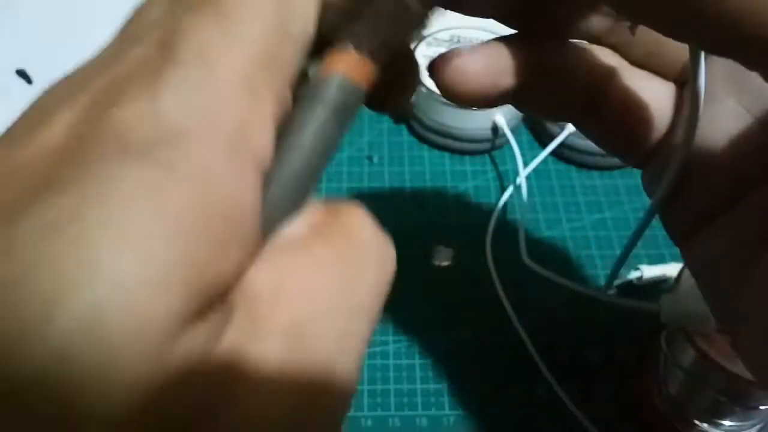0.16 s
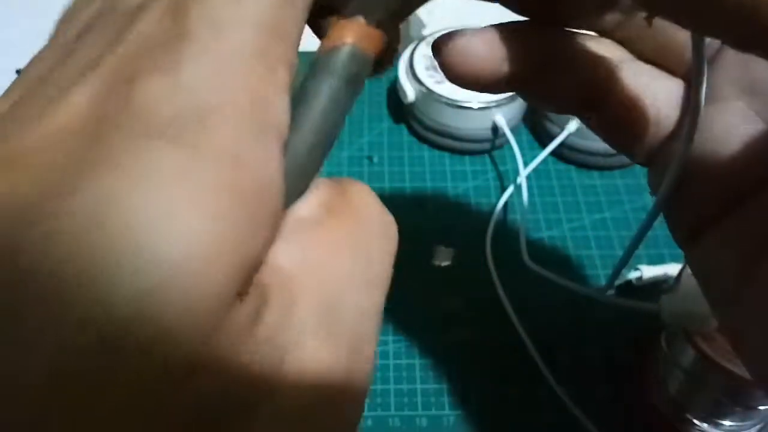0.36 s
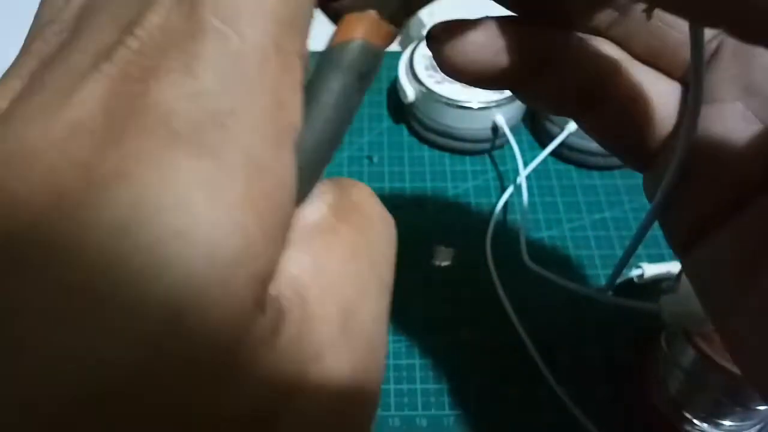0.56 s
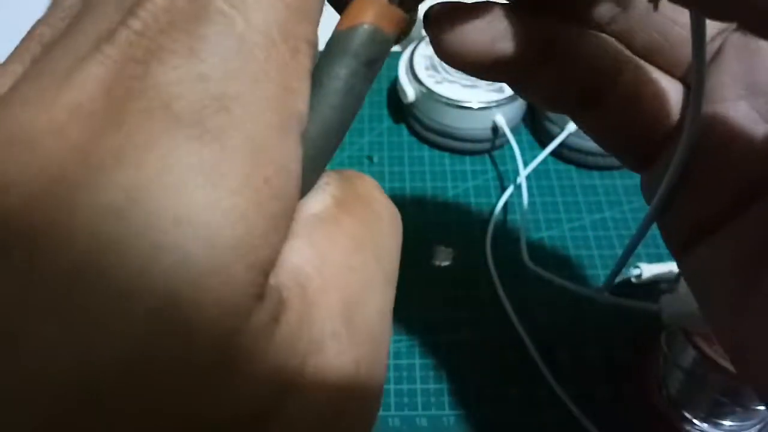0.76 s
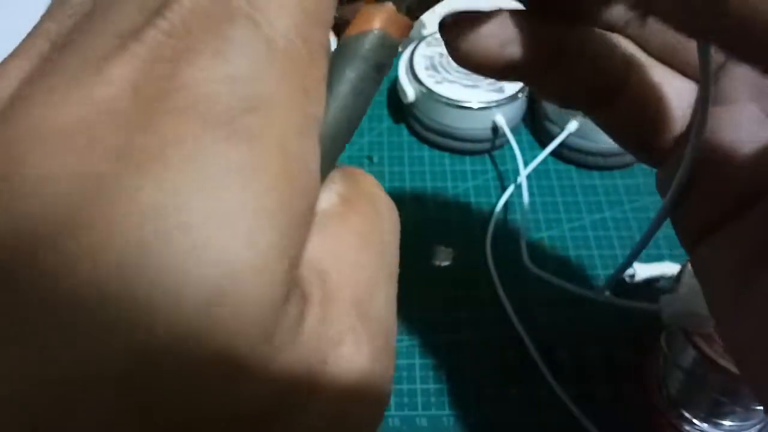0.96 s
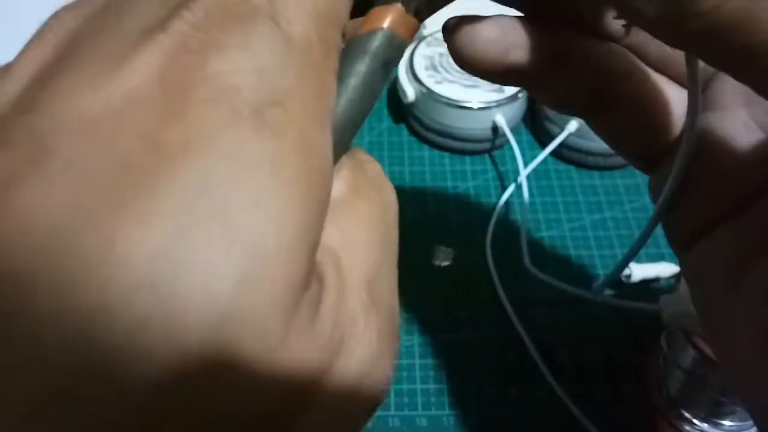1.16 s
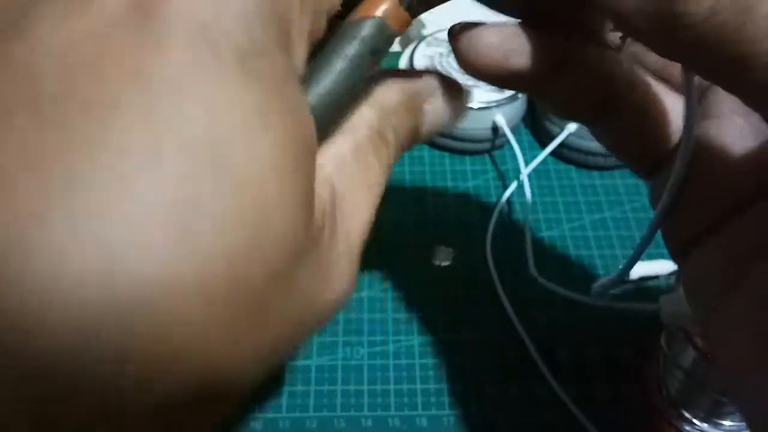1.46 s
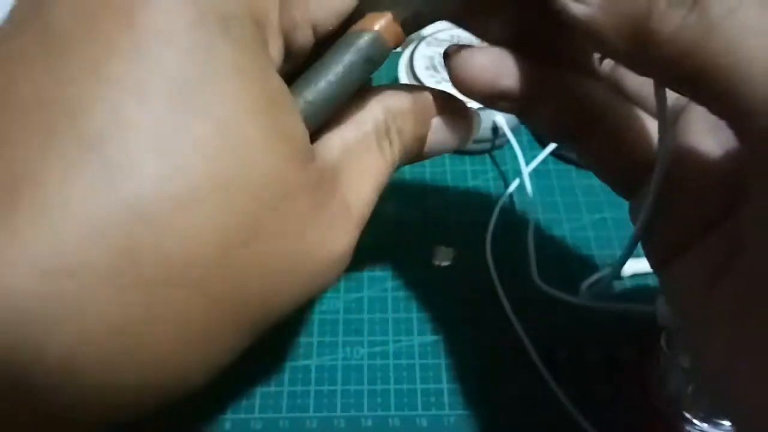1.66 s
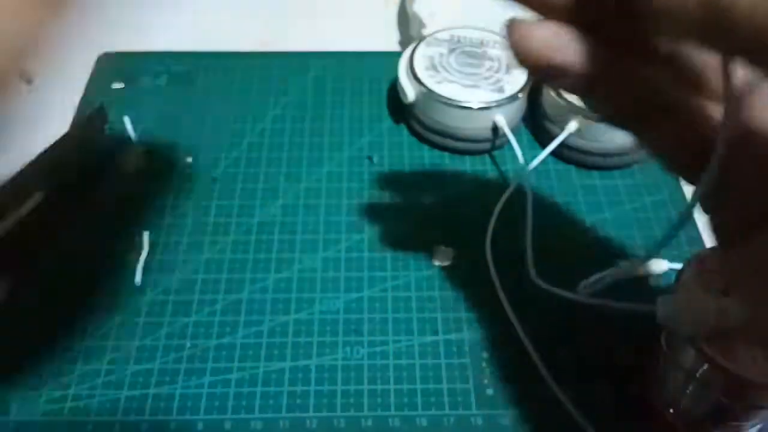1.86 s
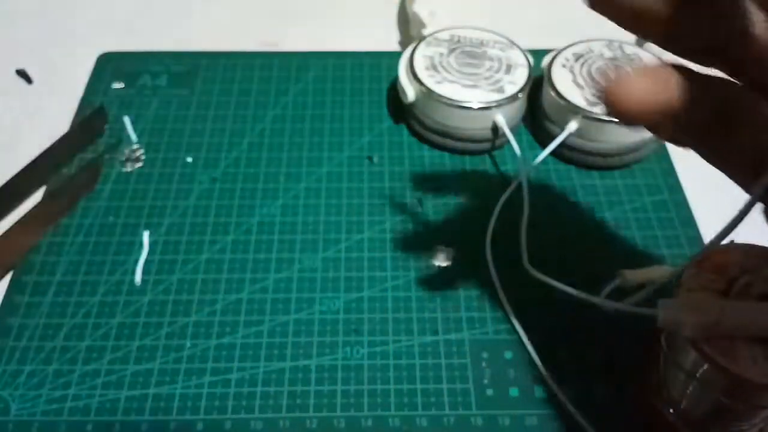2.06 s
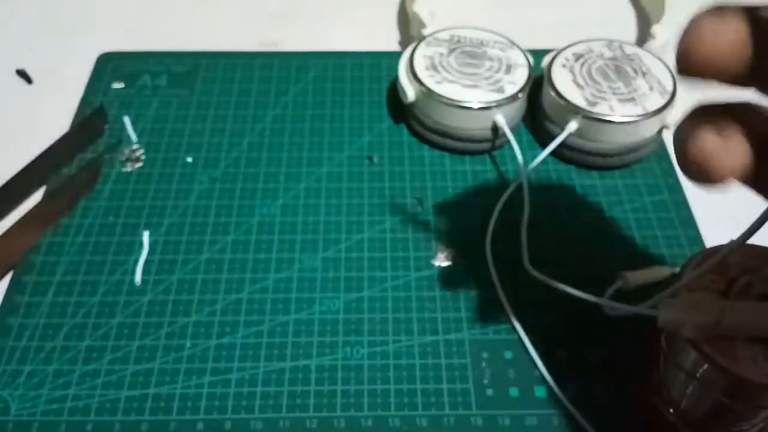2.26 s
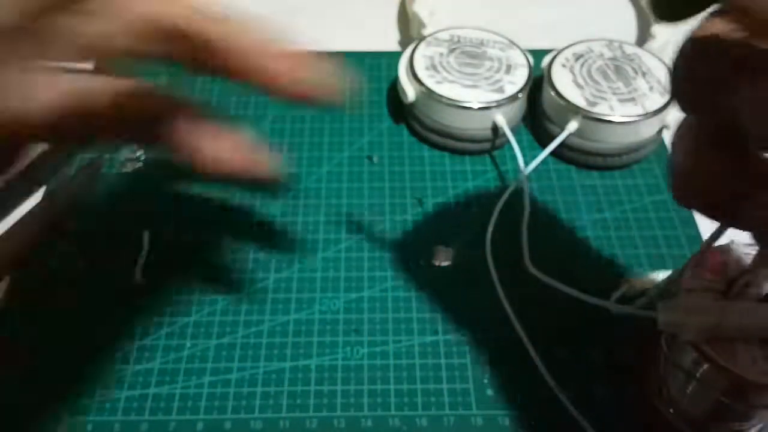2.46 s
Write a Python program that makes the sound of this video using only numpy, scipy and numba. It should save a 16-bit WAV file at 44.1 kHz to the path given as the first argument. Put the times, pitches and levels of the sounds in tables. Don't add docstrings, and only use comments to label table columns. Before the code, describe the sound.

A tool drop on a matted work table is the main sound: hard woody knocks and cracks bounce from 2.35 to 2.5 seconds, with a short room tail. Before it, soft low hand bumps cluster in the first 0.6 seconds and near 1.1. A bright cutter snap rings briefly at 1.68, with a smaller tick at 1.85. Steady hum, hiss and shifting rumble continue, ducking around loud hits.

```python
import sys
import numpy as np
from scipy import signal
from scipy.fft import rfft, irfft
from scipy.io import wavfile
from scipy.ndimage import uniform_filter1d, minimum_filter1d
from numba import njit

SR = 44100
rng = np.random.default_rng(int(sys.argv[2]) if len(sys.argv) > 2 else 0)


def to_linear_factor(level_db):
    exponent = np.asarray(level_db, float) / 20
    return 10 ** exponent


def waveform_to_disk(signal):
    frames = np.transpose(np.atleast_2d(signal))
    scaled = np.clip(frames, -1, 1) * 32767
    samples = np.round(scaled).astype(np.int16)
    wavfile.write(sys.argv[1], SR, samples)


N = 114660
IMPACT_TOP_HZ = 15500


def curve(table, hz):
    a = np.array(table, float)
    return np.interp(np.log(hz + 1), np.log(a[:, 0]), a[:, 1])


def level(x, db):
    return x * to_linear_factor(db) / np.sqrt(np.mean(x ** 2))


def band(x, hz, width_hz):
    return signal.lfilter(*signal.iirpeak(hz, hz / width_hz, fs=SR), x)


def lowpass(x, order, hz):
    return signal.sosfilt(signal.butter(order, hz, fs=SR, output="sos"), x)


def ring(x, hz, t60_s):
    pole = np.exp(2j * np.pi * hz / SR - np.log(1000) / (t60_s * SR))
    return signal.lfilter([1], [1, -pole], x + 0j).imag


def strikes(times_s, db):
    x = np.zeros(N)
    np.add.at(x, (np.asarray(times_s) * SR).astype(int), to_linear_factor(np.asarray(db)))
    return x


def fade(x, t60_s):
    return signal.lfilter([1], [1, -np.exp(-np.log(1000) / (t60_s * SR))], x)


def walk(rate_hz):
    k = int(SR / rate_hz)
    held = np.repeat(rng.standard_normal(N // k + 1), k)
    return 1.79 * uniform_filter1d(uniform_filter1d(held, k), k)[:N]


@njit
def hold(x, fall):
    y, e = np.empty(len(x)), 0.
    for i in range(len(x)):
        e = max(x[i], e * fall)
        y[i] = e
    return y


def air():
    # frequency [Hz], spectral level [dB].
    hiss_colour = [(25, -4), (60, -1), (130, -5.5), (220, 5.5), (700, -1), (950, 0.5), (1500, -1.5),
                   (3000, 0)]
    # centre [Hz], width [Hz], level [dB rms].
    housings = [(817, 156, -71.5), (1102, 35, -65.5), (2172, 100, -64), (4250, 440, -58),
                (6440, 240, -60.5)]
    # time [s], rumble level [dB rms].
    motor_load = [
        (0, -47.5),
        (.55, -67.5),
        (.66, -55),
        (1.05, -59.5),
        (1.2, -58),
        (1.6, -74),
        (1.95, -59.5),
        (2.3, -67.5),
        (2.6, -51),
    ]
    hz = np.arange(N // 2 + 1) * SR / N
    spectrum = rfft(rng.standard_normal(N)) * to_linear_factor(curve(hiss_colour, hz)) * (hz < 15680)
    hiss = level(irfft(spectrum, N), -44.5)
    whistle = np.zeros(N)
    for f, width_hz, db in housings:
        tone = band(band(rng.standard_normal(N), f, width_hz), f, width_hz)
        whistle += level(tone, db) * to_linear_factor(0.77 * walk(7.17))
    load_gain = to_linear_factor(np.interp(np.arange(N) / SR, *np.array(motor_load).T))
    rumble = level(band(band(rng.standard_normal(N), 127, 19), 127, 19), 0) * load_gain
    return hiss * to_linear_factor(0.083 * walk(8.2)) + whistle + rumble


def motor(shaft_hz, orders, drift, flicker_db):
    turn = 2 * np.pi * np.cumsum(shaft_hz * (1 + drift * walk(3.03))) / SR
    out = np.zeros(N)
    for k, db in orders:
        gain = np.sqrt(2) * to_linear_factor(db + flicker_db * k ** .5 * walk(8.84))
        out += gain * np.sin(k * turn + 2 * np.pi * rng.random())
    return out


def motors():
    # multiple of shaft pitch, level [dB rms].
    hum_orders = [(1, -72), (3, -44), (6, -61), (9, -69)]
    # multiple of shaft pitch, level [dB rms].
    fan_orders = [(2, -71), (3, -73), (4, -62.5), (5, -68), (6, -69)]
    return motor(130.38, hum_orders, .0008, .2) + motor(223.8, fan_orders, .00077, 1.0)


def bumps():
    # centre time [s], level [dB], pitch [Hz], length [s].
    pushes = [(.054, -20.5, 119, 0.0043), (.08, -34, 90, 0.007), (.103, -45, 100, 0.01),
              (0.129, -37, 79, 0.013), (.15, -41, 94, 0.011), (.197, -61, 130, 0.017),
              (.272, -42, 348, 0.0099), (.435, -47.5, 346, 0.016), (.527, -40.5, 101, 0.0074),
              (.553, -41, 79, 0.0079), (1.09, -50, 130, .007), (1.122, -26, 104, 0.0033),
              (1.315, -48.5, 115, 0.016), (1.405, -49, 100, 0.0064), (1.815, -49, 76, 0.0096)]
    t = np.arange(N) / SR
    out = np.zeros(N)
    for s, db, hz, length_s in pushes:
        swell = np.exp(-((t - s) / length_s) ** 2)
        out += to_linear_factor(db) * swell * np.cos(2 * np.pi * hz * (t - s))
    return out


def snips():
    # start [s], level [dB], lowest frequency [Hz], ring share [dB].
    ticks = [
        (.098, -38, 6000, -30),
        (1.674, -35, 6500, -30),
        (1.6800, -23, 7900, -30),
        (1.682, -8.5, 2360, 1.5),
        (1.8523, -21.5, 5400, -32),
    ]
    # frequency [Hz], level [dB], t60 [s].
    jaw_modes = [(2590, -17.5, 0.03), (2690, -23.5, 0.056), (3650, -40, 0.0018), (7400, -2.5, 0.012),
                 (11360, 1, 0.0085)]
    rebound_s, rebound_db = .0007, -15
    burst_t60_s, tail_t60_s, tail_db = .0057, .1, -21.5
    out = np.zeros(N)
    for s, db, low_hz, ring_db in ticks:
        hit = strikes([s], [db])
        snap = strikes([s, s + rebound_s], [db, db + rebound_db])
        noise = rng.standard_normal(N)
        tail = to_linear_factor(tail_db) * fade(hit, tail_t60_s) * lowpass(noise, 12, IMPACT_TOP_HZ)
        burst = fade(hit, burst_t60_s) * noise + tail
        jaws = np.zeros(N)
        for f, mode_db, t60_s in jaw_modes:
            share_db = ring_db if f < 8000 else 0
            jaws += to_linear_factor(mode_db + share_db) * ring(snap, f, t60_s)
        bright = to_linear_factor(7) * np.diff(burst, prepend=0)
        out += signal.lfilter(*signal.butter(3, low_hz, "high", fs=SR), bright + jaws)
    return out


def drop():
    # start [s], level [dB], table share [dB], crack level [dB].
    bounces = [
        (2.3477, -1.5, 14, -11),
        (2.3631, -5, 1, -19.5),
        (2.366, 0.5, -14.5, -26),
        (2.37, -26, -4, -29),
        (2.383, -14.5, 14, -31),
        (2.39, -23.5, 15.5, -41),
        (2.410, 1, 5, -14),
        (2.4592, -5.5, 9, -15.5),
        (2.4672, 1, 9, -15),
        (2.497, -33, -9, -55),
    ]
    # frequency [Hz], level [dB], t60 [s].
    table_modes = [(157, -39, 0.2), (251.6, -19, .13), (321.3, -29, 0.16), (480, -19, 0.057),
                   (592.6, -21, .09), (744, -34.5, 0.15), (935, -29.5, 0.19), (1070, -49, 0.027),
                   (1305, -53, 0.055), (1510, -24.5, 0.027), (1616, -22, 0.051), (1890, -25, 0.034),
                   (2060, -28, 0.033), (360.5, -22.5, 0.078)]
    handle_hz, handle_width_hz = 1300, 760
    lag_cycles = .89
    s, db, body_db, crack_db = np.array(bounces).T

    knock = -strikes(s, db) * SR / handle_width_hz * to_linear_factor(-8)
    for _ in range(3):
        knock = band(knock, handle_hz, handle_width_hz)

    spot_db = 4.3 * rng.standard_normal((len(s), len(table_modes)))
    table = np.zeros(N)
    for k, (f, mode_db, t60_s) in enumerate(table_modes):
        sign = 1 if f < 700 else (-1) ** k
        hits = strikes(s + lag_cycles / f, db + body_db + spot_db[:, k])
        table += sign * to_linear_factor(mode_db) * ring(hits, f, t60_s)
    table = signal.lfilter(*signal.butter(2, 157, "high", fs=SR), table)

    tick = strikes(s, crack_db)
    spray = to_linear_factor(-9.5 + 1.2 * walk(300)) * fade(tick, .14)
    mid = band(rng.standard_normal(N), 2000, 3400)
    treble = band(band(rng.standard_normal(N), 12000, 9000), 12600, 8200)
    crack = (fade(tick, .022) + spray) * (mid + to_linear_factor(-6) * treble)
    crack = lowpass(crack, 12, IMPACT_TOP_HZ)

    soft = lowpass(band(rng.standard_normal(N), 760, 2660), 4, 1700)
    tail = fade(strikes(s + .0014, db), .1) * level(soft, -18)
    return knock + to_linear_factor(-4.5) * table + crack + tail


def scene():
    return (air() + motors() + bumps() + snips() + drop())[None]


def roll_off(x):
    return signal.sosfilt(signal.butter(12, 16670, fs=SR, output="sos"), x)


def record(dry):
    # frequency [Hz], gain [dB].
    mic_response = [(3000, 0), (7200, -5), (8050, -15), (9800, -3.5), (12600, -20.5), (13900, -18),
                    (14900, -8.5), (16300, -17)]
    limit_db, limit_share, ahead_s, release_s = -18.5, .4, .0066, .028
    hz = np.arange(N // 2 + 1) * SR / N
    x = irfft(rfft(dry[0]) * to_linear_factor(curve(mic_response, hz)), N)
    x = signal.sosfilt(signal.butter(2, 40, "high", fs=SR, output="sos"), x)
    x = lowpass(x, 12, 16100)
    ahead = int(ahead_s * SR)
    nearby_peak = -minimum_filter1d(-np.abs(x), 2 * ahead + 1)
    peak = hold(nearby_peak, np.exp(-1 / (release_s * SR)))
    gain = np.minimum(1, to_linear_factor(limit_db) / peak) ** limit_share
    gain = uniform_filter1d(gain, ahead)
    return roll_off((x * gain)[None])


dry = scene()
out = record(dry)
waveform_to_disk(out)
```